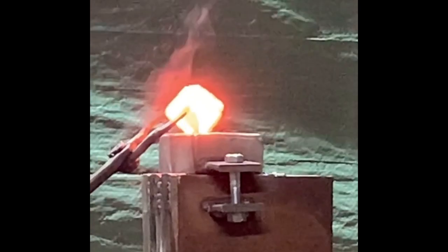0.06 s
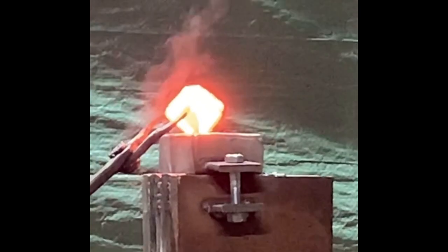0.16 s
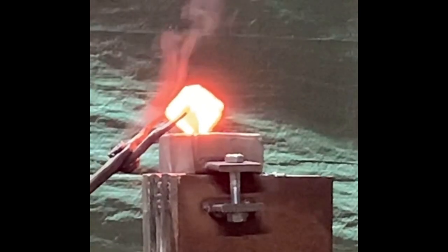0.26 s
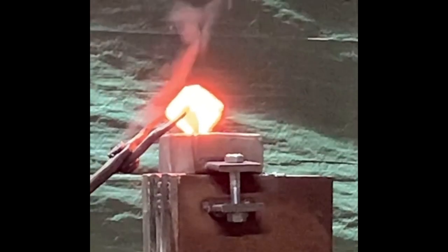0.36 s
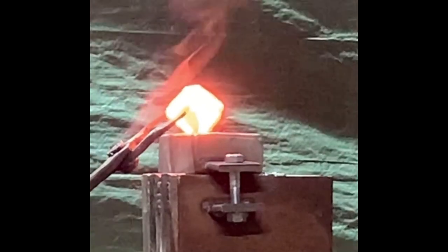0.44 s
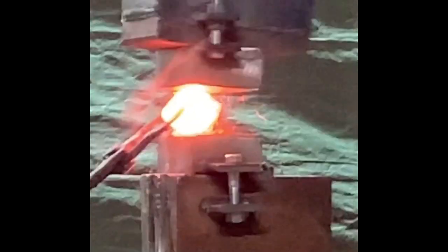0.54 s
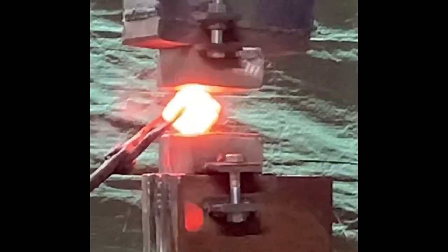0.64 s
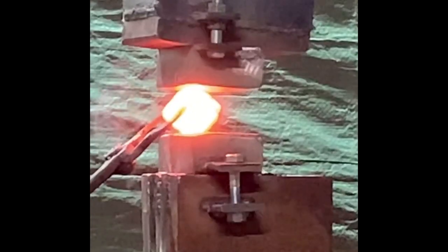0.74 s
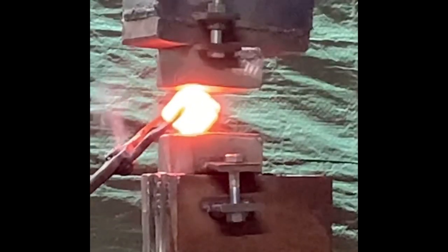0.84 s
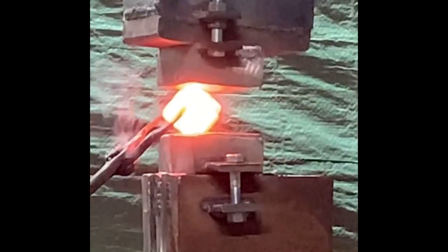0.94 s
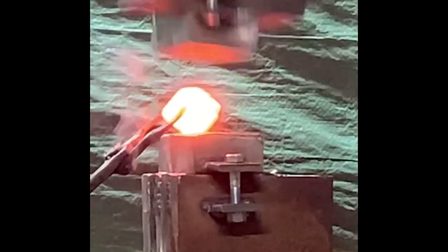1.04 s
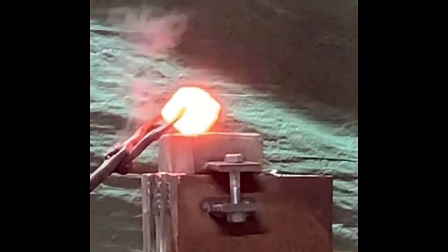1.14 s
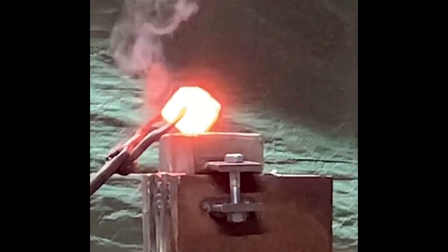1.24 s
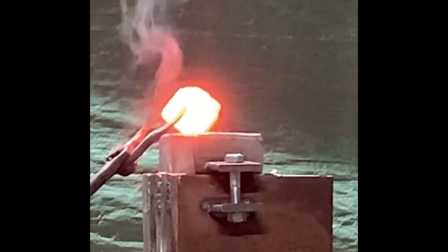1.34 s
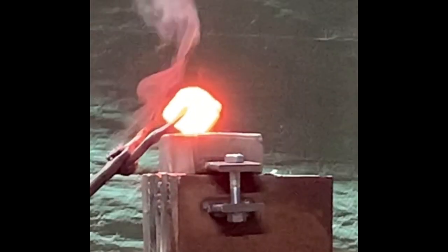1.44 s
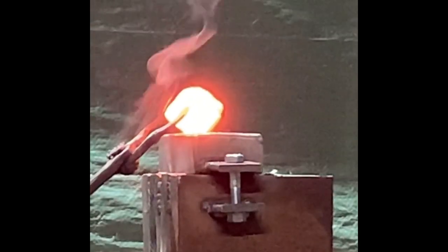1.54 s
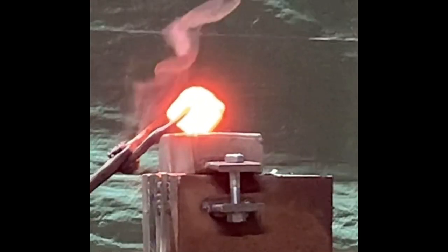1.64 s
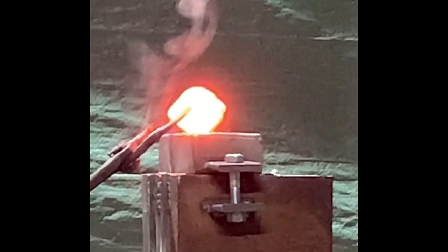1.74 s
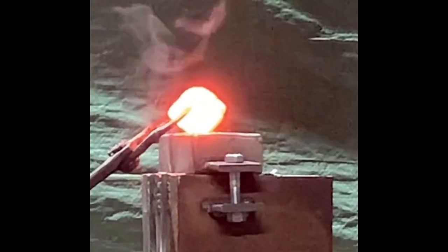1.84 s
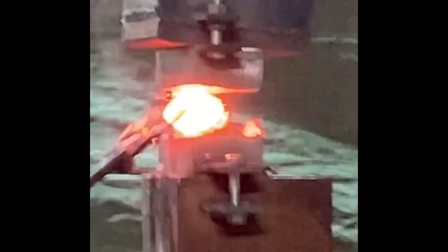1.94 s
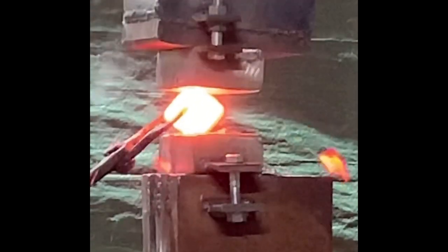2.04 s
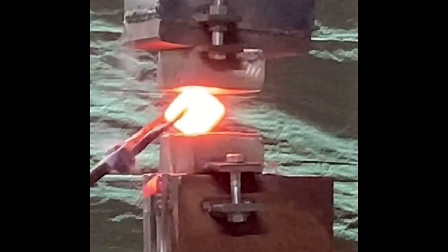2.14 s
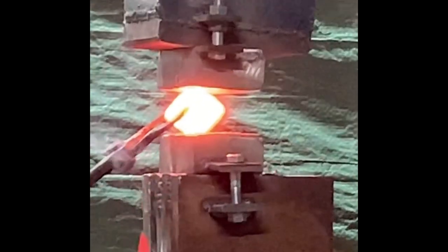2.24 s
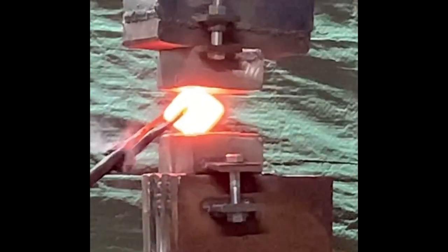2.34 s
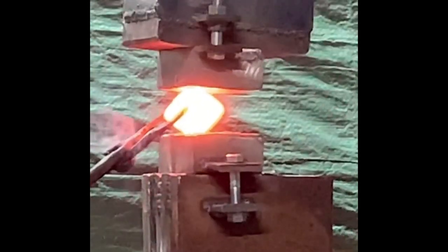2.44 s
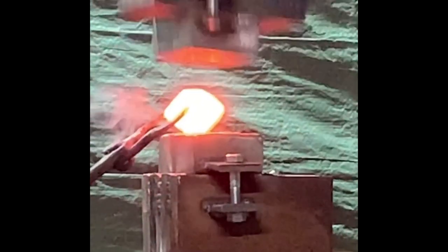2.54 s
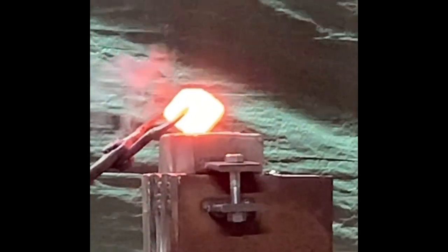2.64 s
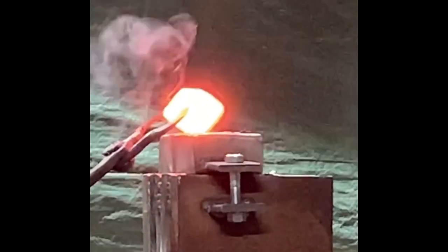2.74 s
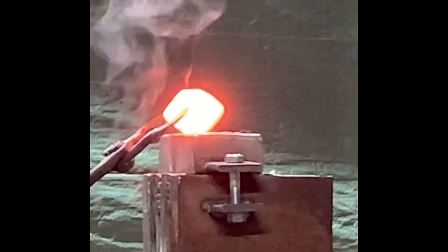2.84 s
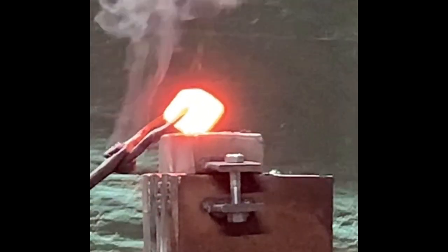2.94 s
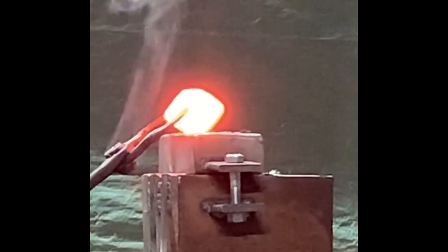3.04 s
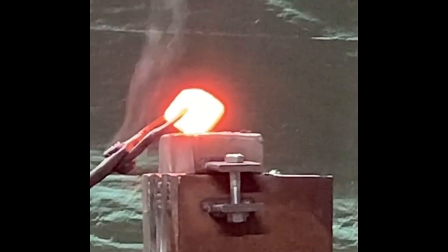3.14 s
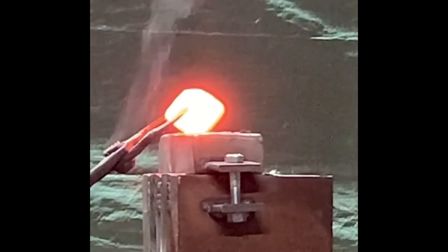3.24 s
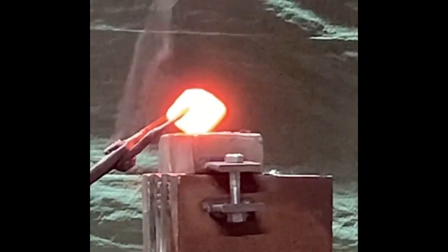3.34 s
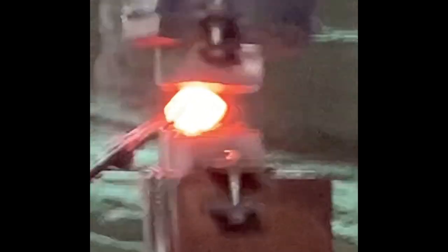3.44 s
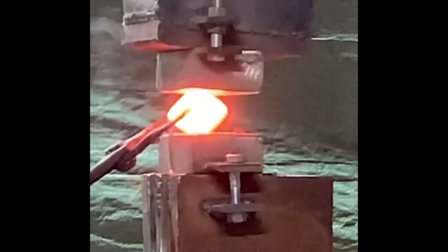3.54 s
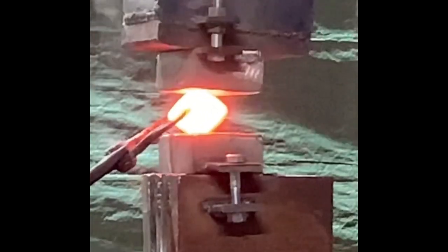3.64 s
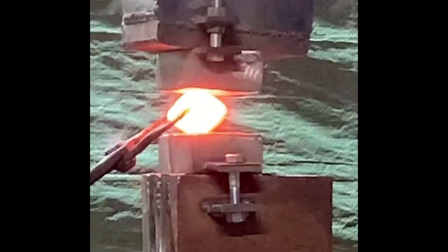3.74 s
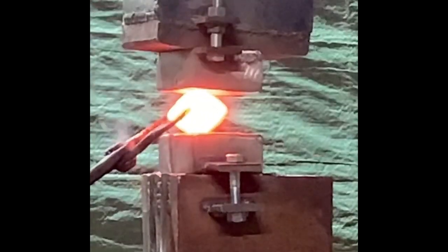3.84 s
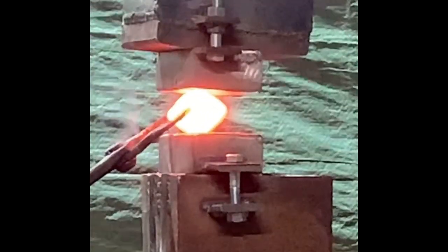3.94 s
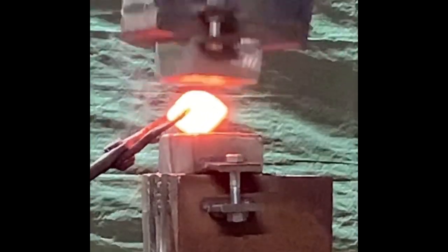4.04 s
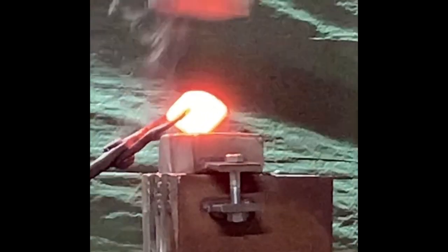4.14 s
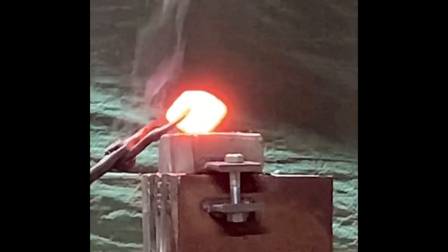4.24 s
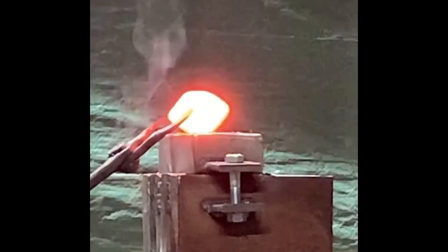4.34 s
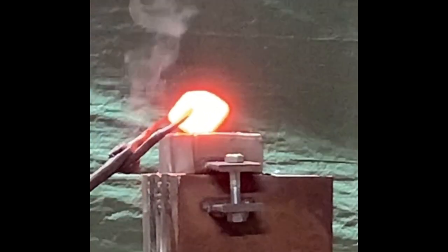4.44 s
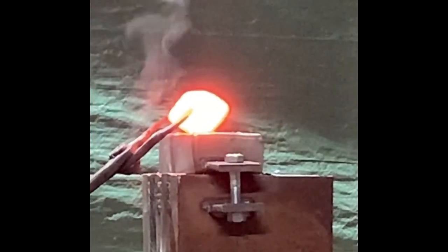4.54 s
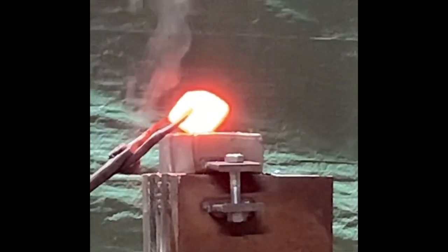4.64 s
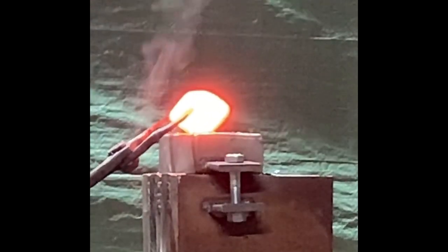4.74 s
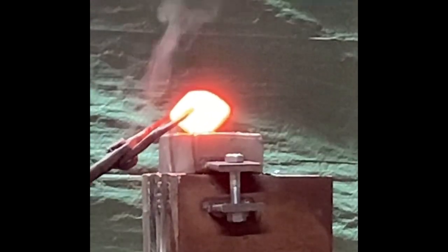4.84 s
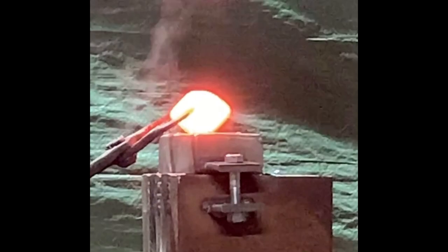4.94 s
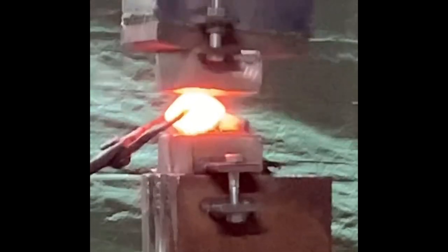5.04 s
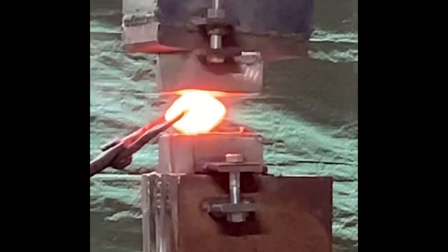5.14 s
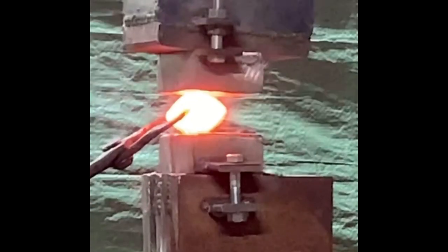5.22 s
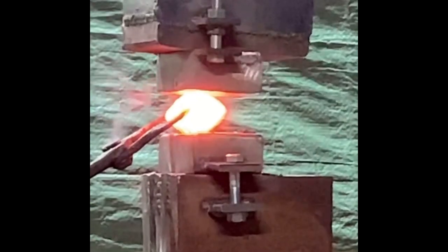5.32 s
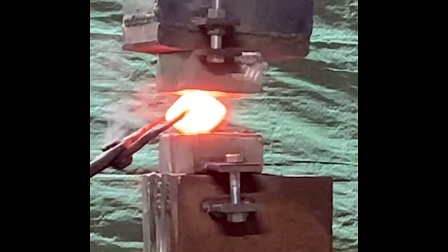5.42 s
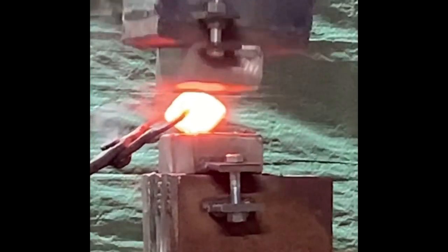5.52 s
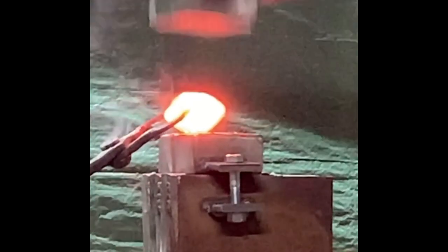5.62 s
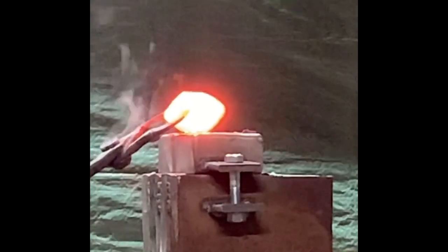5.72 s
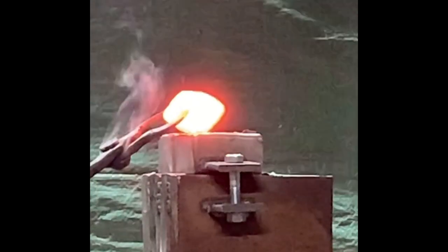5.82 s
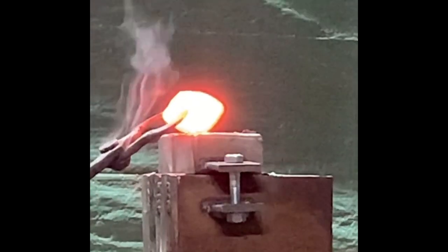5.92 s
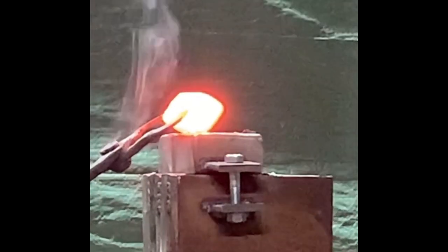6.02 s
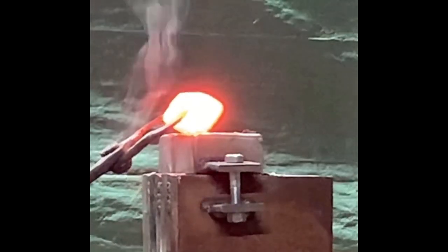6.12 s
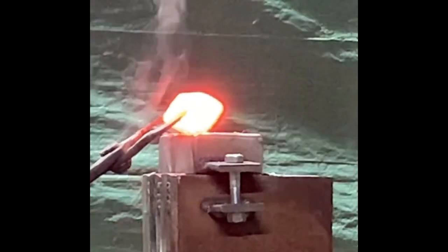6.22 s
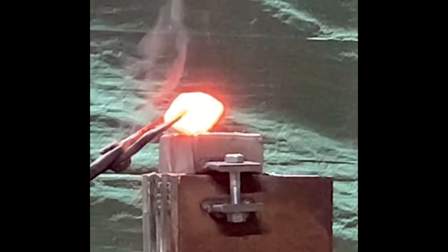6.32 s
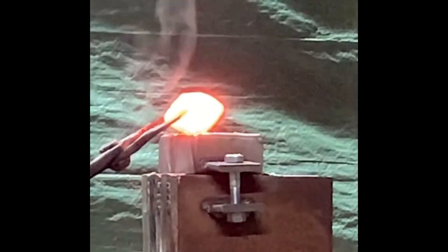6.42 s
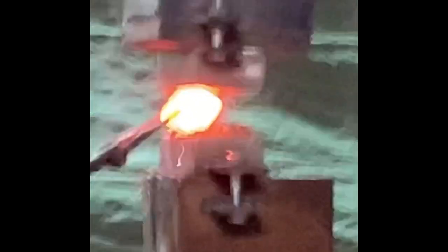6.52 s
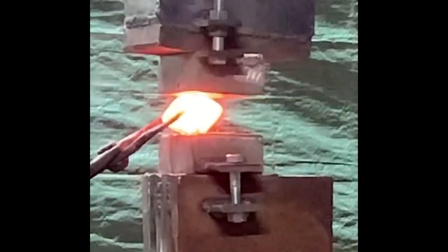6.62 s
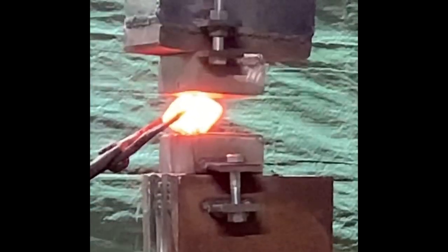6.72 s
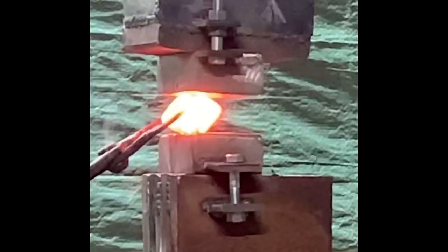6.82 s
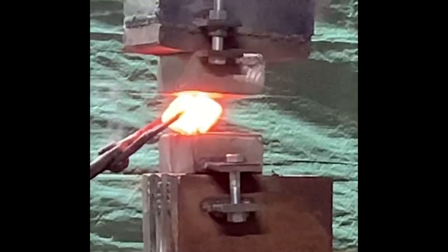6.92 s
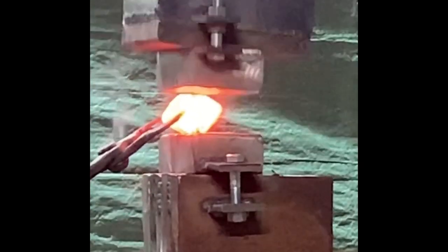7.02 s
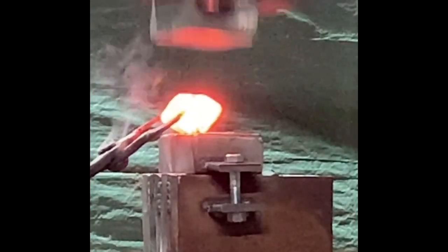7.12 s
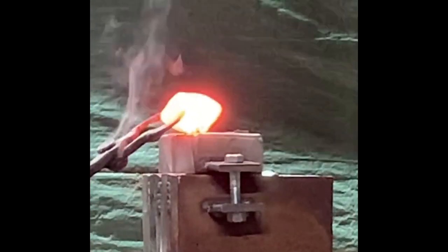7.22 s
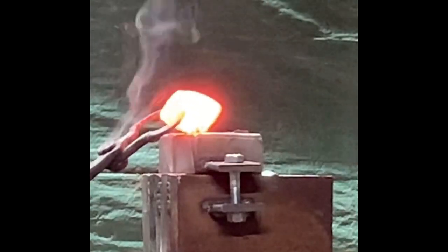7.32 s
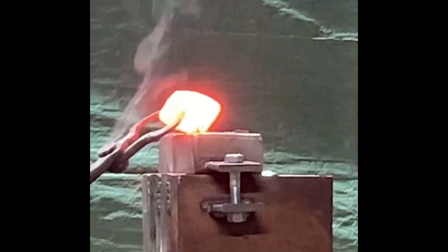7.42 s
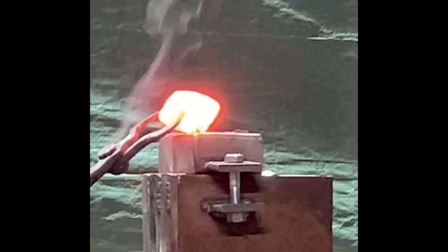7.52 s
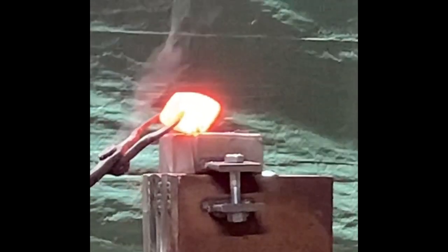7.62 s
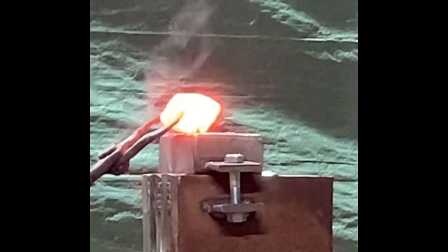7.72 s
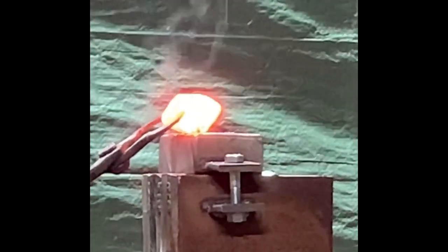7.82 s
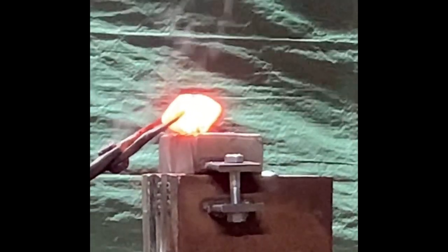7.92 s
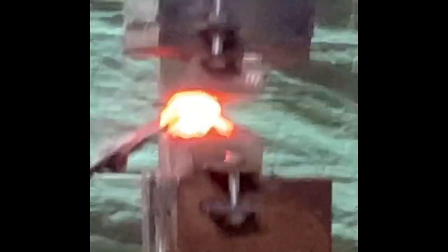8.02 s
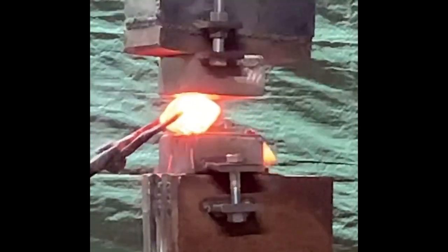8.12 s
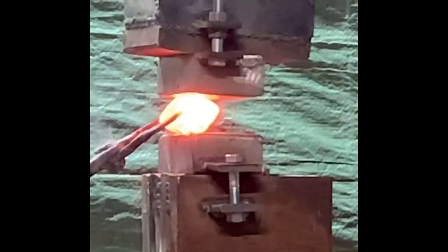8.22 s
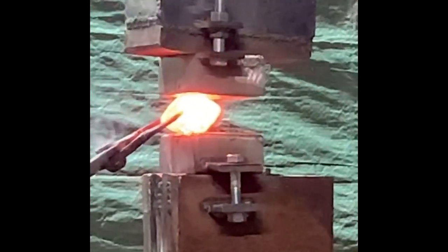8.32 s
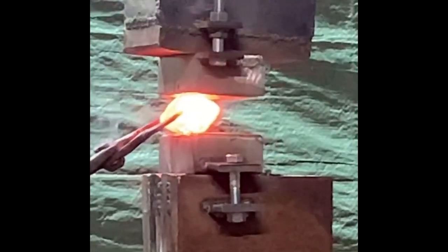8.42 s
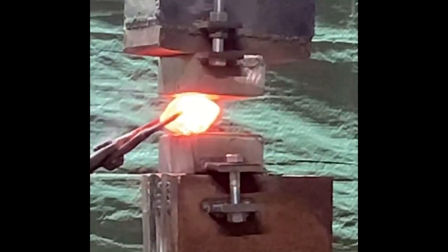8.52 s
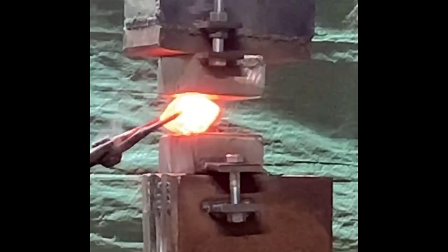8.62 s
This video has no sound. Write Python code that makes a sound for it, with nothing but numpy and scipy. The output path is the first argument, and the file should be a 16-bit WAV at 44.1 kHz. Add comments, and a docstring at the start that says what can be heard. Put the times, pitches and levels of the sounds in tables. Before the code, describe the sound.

Six heavy drop-hammer blows thud and crack on hot steel about 1.5 seconds apart, tackle clinking between them over a roaring gas forge.

```python
"""Drop hammer and gas forge

A drop hammer strikes hot steel six times, about a second and a half apart, before a roaring gas forge.
Impacts are noise bursts, wave packets and decaying modes; the ram's slide is noise rising in pitch.
Tackle clinks and jingles after each blow; flakes, tongs and guides add shaped noise and narrow resonances.
The forge is coloured noise that slowly settles; a limiter ducks the whole sound under strong peaks."""
import sys
import numpy as np
from scipy import signal
from scipy.fft import rfft, irfft, next_fast_len
from scipy.io import wavfile
from scipy.ndimage import uniform_filter1d, minimum_filter1d, map_coordinates

SR = 44100
rng = np.random.default_rng(int(sys.argv[2]) if len(sys.argv) > 2 else 0)


def log_audio(samples):
    """Write samples as a 16-bit WAV file to the path given in sys.argv[1]."""
    # one column per channel
    frames = np.atleast_2d(samples).T
    # limit to full scale, then quantise
    limited = np.clip(frames, -1, 1)
    pcm = np.round(limited * 32767).astype(np.int16)
    wavfile.write(sys.argv[1], SR, pcm)


N = 382347
TIME = np.arange(N) / SR

# All levels in the tables are relative; spectra are levels per Hz of bandwidth.
# Hammer blows; the yield of the hot steel delays the thud:
# start_s, force_db, crack_db, rebound_db, hoist_rattle_db, yield_s, flying_scale_db
BLOWS = [(0.5406, 5, 5.5, -25, 2, 0, 8.5), (1.97, 0, 3.5, -22, -1.5, .0006, 9.5),
         (3.4816, -0.5, 4.5, -3, -4.5, 0, 3), (5.039, -3, 0.5, 0, -10, 0.00065, 9.5),
         (6.5480, -3, 4.5, 4, -6, 0, -1), (8.069, -2, 2.5, -30, -3, 0.0029, -10)]
# Bending waves of the frame, nominal pitch and crest time: freq_hz, level_db, crest_s
BENDING_WAVES = [(133, -5.5, 0.0124), (386, -6.5, 0.00782), (463, -16, 0.00635), (832, -10.5, 0.00478),
                 (1520, -13.5, 0.0032), (2860, -17, 0.00184)]
# Modes of anvil and frame: freq_hz, level_db, t60_s
FRAME_MODES = [(112, 2.5, 0.13), (204, .5, 0.22), (347, 2, 0.17), (410, -4, .16), (481, -2, 0.19),
               (582, 1, 0.18), (808, -1, 0.14), (1023, 1, 0.13), (1085, -6, .13), (1321, -5, 0.17),
               (1486, -4, .15), (1560, -8, 0.13), (2031, -13, .16), (2128, -13, 0.15), (6782, -15, .12),
               (12345, -22, .25), (12660, -16, 0.27)]
# Modes of the hopping ram: freq_hz, level_db, t60_s
RAM_MODES = [(1060, -11, 0.15), (1304, -1.5, 0.17), (1450, -2, 0.086)]
# Modes of the tackle: freq_hz, level_db, t60_s
TACKLE_MODES = [(5640, -1, 0.12), (5870, -9, 0.17), (7470, 4, .1), (7610, 5, 0.24), (13150, -5, .1)]
# Spectrum of the dies' crack: freq_hz, level_db
CRACK_COLOUR = [(1000, -1), (2900, -18), (4000, -25), (5300, -4), (6900, 10), (8000, 0), (10500, -0.5),
                (12200, -2), (16000, 4.5)]
# Spectrum of the clatter in the shop: freq_hz, level_db
CLATTER_COLOUR = [(30, 5), (130, 14.5), (300, 1), (560, 7), (720, -1.5), (1100, 3), (1550, -5), (1800, -12),
                  (2400, -2.5), (4000, -9), (7500, -5.5), (11000, -11), (12600, -7), (16000, -17)]
# Spectrum of the rebound: freq_hz, level_db
REBOUND_COLOUR = [(200, 10), (620, 9), (900, 4), (1350, 6), (2100, -8), (6000, -9), (16000, -13)]
# Spectrum of the ram running down its guides: freq_hz, level_db
SLIDE_COLOUR = [(500, 0), (1200, 16.5), (1700, -7), (4350, 12), (4850, 21.5), (5300, 14.5), (6200, 8.5),
                (8000, 1), (8950, 5), (9350, 24), (10000, 7), (16000, 11)]
# Spectrum of brittle scale crunching: freq_hz, level_db
CRUSH_COLOUR = [(250, -26), (600, 7.5), (1300, 2), (3000, 4.5), (6000, -7), (16000, -26)]
# Spectrum of flying flakes of scale: freq_hz, level_db
FLAKE_COLOUR = [(2000, -12), (6000, 3), (10000, -6), (12500, 2), (16000, 7.5)]
# Spectrum of the snapping and rubbing tackle: freq_hz, level_db
STEEL_COLOUR = [(1000, 1), (4900, -6), (5600, 11), (6500, 1), (7350, 3), (7590, 17), (7850, 5),
                (10500, -5.5), (16000, 2)]
# Spectrum of the dry contact in a hard knock: freq_hz, level_db
CONTACT_COLOUR = [(1000, -6), (4000, -11), (12700, -14), (13150, 17), (13700, -1), (16000, -7)]
# Spectrum of the tongs' ticks: freq_hz, level_db
TICK_COLOUR = [(800, -5), (4000, -7), (8500, 1), (9500, 10), (10500, -2), (16000, 3.5)]
# Spectrum of the ram rubbing its guides: freq_hz, level_db
GUIDE_COLOUR = [(600, -10), (1050, -8), (1170, 9), (1300, -16), (1600, -21), (6000, -46)]
# Spectrum of the flame: freq_hz, level_db
ROAR_COLOUR = [(20, -38), (45, -13.5), (80, 1.5), (105, -3), (130, -7.5), (170, 0.5), (225, -9),
               (255, -5.5), (305, 1.5), (385, -3.5), (470, -13.5), (555, -17), (635, -12), (720, -21),
               (1000, -26.5), (2000, -45)]
# Spectrum of the gas jet heard directly: freq_hz, level_db
JET_COLOUR = [(600, 8), (950, 5), (1750, -5.5), (2100, 5), (3100, 2), (4200, 1), (5500, -0.5), (7400, -62),
              (16000, -64)]
# Spectrum of the hiss all around: freq_hz, level_db
HISS_COLOUR = [(600, -15), (1000, 4.5), (1700, 4), (2200, -3), (3800, -4), (6500, -1.5), (11000, -2),
               (13500, -4), (15500, 4)]
# Left-right likeness of the forge, before the treble spacing: freq_hz, correlation
FORGE_LIKENESS = [(60, 1), (130, 0.91), (290, 0.82), (640, -0.24), (1400, -0.068), (3100, -0.2),
                  (4300, -0.47), (5400, 0.73), (6300, -0.049), (8500, -0.067)]
# Left-right likeness of the other noises, before the treble spacing: freq_hz, correlation
BLOW_LIKENESS = [(100, 0.99), (400, 0.57), (1000, 0.53), (2000, 0.31), (3100, -0.44), (4300, 0.26),
                 (5400, -0.2), (6500, 0.65), (8500, -0.16)]
# Hard knocks of the swinging tackle: start_s, level_db
KNOCKS = [(0.0538, -27), (0.7497, -19), (0.818, -26), (0.955, -33), (0.997, -28), (1.1323, -27.5),
          (2.442, -30.5), (3.685, -26), (3.7443, -27.5), (4.001, -28.5), (4.176, -34), (6.7824, -32),
          (8.308, -29.5), (8.4813, -32.5)]
# Tongs slipping on the work: centre_s, level_db, pitch_hz
SLIPS = [(0.286, -39.5, 6170), (3.19, -44, 4730), (4.548, -38.5, 7530), (6.12, -46, 6000)]
# Dry ticks of the tongs: start_s, level_db
TICKS = [(2.691, -21.5), (2.8434, -26), (4.3141, -28), (5.5024, -29.5)]
# Ram rubbing tight spots in its guides: centre_s, level_db, gaussian_width_s
RUBS = [(3.86, -38, 0.027), (5.345, -37.5, 0.028), (6.246, -39, 0.026), (7.79, -40, 0.019)]
# Narrow resonances of shop and steel, one pattern shared by all rippled noises: freq_hz; unit spread
RIPPLE_HZ = np.geomspace(400, 17000, num=420)
RIPPLE = rng.standard_normal(len(RIPPLE_HZ)) * (RIPPLE_HZ > 600)

ROAR_DB, HISS_DB = -32, -45  # before the extra loudness of the start
START_EXTRA_DB, SETTLE_S = 12, 4.53
# Hoist: delay until the slack is taken up, then median interval and mean fading of the clinks
TAKE_UP_S, TAKE_UP_DB = .173, -21.5
CLINK_STEP_S, CLINK_DB, CLINK_FADE_DB_PER_S = 0.074, -29.5, 12.5
SLIP_WIDTH_S = 0.017
CUTOFF_HZ = 15700


def from_db(db):
    """Logarithmic level: 20 dB is a factor of ten in amplitude."""
    return 10 ** (np.asarray(db) / 20)


def rms_one(x):
    """Normalisation of mean power to one."""
    return x / np.sqrt(np.mean(x ** 2) + 1e-20)


def at_hz(points, hz):
    """Linear interpolation of a table on a log-frequency axis."""
    known_hz, values = np.transpose(points)
    return np.interp(np.log(hz + 1), np.log(known_hz), values)


def noise(spectrum, likeness, size=N, ripple_db=0, port_lag_s=0.00018, port_share=0.99):
    """Spectral shaping: mid and side noise set colour and interchannel correlation; rms 1."""
    padded = next_fast_len(size)
    hz = np.fft.rfftfreq(padded, 1 / SR)
    resonances_db = ripple_db * np.interp(hz, RIPPLE_HZ, RIPPLE)
    colour = from_db(at_hz(spectrum, hz) + resonances_db)
    mid, side = rfft(rng.standard_normal((2, padded))) * colour
    # treble reaches the two microphones a moment apart, so it swings in and out of phase with pitch
    treble = np.minimum(hz / 8000, 1) ** 6
    spaced = port_share * treble * np.cos(2 * np.pi * hz * port_lag_s)
    alike = np.clip(at_hz(likeness, hz) + spaced, -.95, .98)
    mid, side = mid * np.sqrt(1 + alike), side * np.sqrt(1 - alike)
    stereo = irfft([mid + side, mid - side], padded)
    return rms_one(stereo[:, :size])


def fade(t, t60):
    """Exponential decay from t = 0, falling 60 dB in t60 seconds."""
    return (t >= 0) * np.exp(-np.log(1000) * np.maximum(t, 0) / t60)


def swell(t, rise_s):
    """Gradual onset: a Gaussian approach to full amplitude from t = 0."""
    return 1 - np.exp(-(np.maximum(t, 0) / rise_s) ** 2)


def bell(t, width_s):
    """Gaussian envelope centred on t = 0."""
    return np.exp(-.5 * (t / width_s) ** 2)


def add(out, s, sound):
    """Superposition: mix a sound in at time s."""
    start = int(np.clip(round(s * SR), 0, N))
    out[:, start:start + sound.shape[-1]] += sound[..., :N - start]


def ring(modes, t, vary_db, detune, apart_hz):
    """Modal decay: struck modes vary in strength, and high ones differ in phase between channels."""
    out = np.zeros((2, len(t)))
    for hz, db, t60 in modes:
        strength, pitch, phase, apart = rng.standard_normal(4)
        channel_phase = apart * min(hz / apart_hz, 1) * np.array([[.5], [-.5]])
        phases = np.pi * (phase + channel_phase)
        tone = np.sin(2 * np.pi * hz * (1 + detune * pitch) * t + phases)
        out += from_db(db + vary_db * strength) * tone * fade(t, t60)
    return out


def grain(size, depth_db, grain_s):
    """Amplitude modulation: a random gain that jumps about within milliseconds; rms 1."""
    slow = uniform_filter1d(rng.standard_normal(size), int(grain_s * SR) + 1)
    return rms_one(from_db(depth_db * rms_one(slow)))


def flutter(x, depth_db, width_hz, length_s, size=256):
    """Short-time spectral modulation: narrow bands of a noise swell and sink."""
    hz, s, bands = signal.stft(x, SR, nperseg=size)
    slow = rng.standard_normal((len(hz), len(s)))
    slow = uniform_filter1d(slow, int(length_s / s[1]) + 1, axis=1)
    slow = rms_one(uniform_filter1d(slow, int(width_hz / hz[1]) + 1, axis=0))
    gain = rms_one(from_db(depth_db * slow))
    return signal.istft(bands * gain, SR, nperseg=size)[1][:, :x.shape[1]]


def forge(jet_db=-3.5):
    """Turbulence: flame roar and gas hiss as noise, the direct jet reaching the left microphone first."""
    settling = from_db(START_EXTRA_DB * np.exp(-TIME / SETTLE_S))
    jet = noise(JET_COLOUR, FORGE_LIKENESS, ripple_db=2.5)[0]
    direct = np.array([jet, np.roll(jet, 21)])  # right lags by 21 samples
    around = noise(HISS_COLOUR, FORGE_LIKENESS, ripple_db=4.5)
    hiss = flutter(from_db(jet_db) * direct + around, depth_db=2.0, width_hz=350, length_s=.03)
    roar = noise(ROAR_COLOUR, FORGE_LIKENESS)
    return settling * (from_db(ROAR_DB) * roar + from_db(HISS_DB) * hiss)


def lift_clinks(s, rattle_db, count=9, uneven=.45, vary_db=1.5):
    """Sudden tension: the slack snaps taut, then clinks follow unevenly and fade; gives (s, dB)."""
    step, strength = rng.standard_normal((count, 2)).T
    later = np.cumsum(CLINK_STEP_S * np.exp(uneven * step))
    levels = CLINK_DB - CLINK_FADE_DB_PER_S * later + vary_db * strength
    events = [(0, TAKE_UP_DB), *zip(later, levels)]
    return [(s + TAKE_UP_S + wait, rattle_db + db) for wait, db in events]


def hoist(lift_s=0.32, spread_s=0.21, jingle_db=-48.0, rub_db=-35.0):
    """Impact and friction: tackle clinks, jingles and rubs in each lift; knocks have a dry contact."""
    snap_db, ring_db, contact_db, contact_t60 = -0.5, -9.0, -1.0, 0.052
    out, t = np.zeros((2, N)), TIME[:SR // 5]
    lifting = np.zeros(N)
    strikes = list(KNOCKS)
    for s, _, _, _, rattle_db, _, _ in BLOWS:
        lifting += from_db(rattle_db) * bell(TIME - s - lift_s, spread_s)
        strikes += lift_clinks(s, rattle_db)
        for _ in range(18):  # small jingles
            moment = s + lift_s + spread_s * rng.uniform(-0.53, 2.4)
            strikes.append((moment, jingle_db + rattle_db + rng.normal(0, 1.4)))
    for s, db in strikes:
        snap = noise(STEEL_COLOUR, BLOW_LIKENESS, len(t), ripple_db=3.0) * fade(t, 0.12)
        modes = ring(TACKLE_MODES, t, vary_db=3, detune=.005, apart_hz=5000)
        clink = from_db(snap_db) * snap + from_db(ring_db) * modes
        add(out, s, from_db(db) * clink * swell(t, 0.00075))
    contacts = sum(from_db(db + contact_db) * fade(TIME - s, contact_t60) for s, db in KNOCKS)
    out += contacts * noise(CONTACT_COLOUR, BLOW_LIKENESS)
    steel = noise(STEEL_COLOUR, BLOW_LIKENESS, ripple_db=3.0)
    rub = flutter(steel, depth_db=4.0, width_hz=400, length_s=0.018)
    return out + from_db(rub_db) * lifting * rub


def squeaks(width_hz=40.0):
    """Friction-excited resonance: each slip of the tongs stirs one narrow band."""
    out, t = np.zeros((2, N)), TIME[:SR // 2]
    middle = t.mean()
    for s, db, hz in SLIPS:
        b, a = signal.iirpeak(hz, hz / width_hz, SR)
        friction = noise([(hz / 2, -20), (hz, 0), (hz * 2, -20)], BLOW_LIKENESS, len(t))
        tone = rms_one(signal.lfilter(b, a, friction))
        add(out, s - middle, from_db(db) * tone * bell(t - middle, SLIP_WIDTH_S))
    return out


def falling_ram(level_db=-30.0, fall_s=0.13, glide=.035, crush_db=-16.5, crush_s=0.0043):
    """Sliding friction grows louder and higher with speed; brittle scale crunches around each impact."""
    speed, crush = np.zeros(N), np.zeros(N)
    for s, *_ in BLOWS:
        speed += np.clip(1 + (TIME - s) / fall_s, 0, None) * (TIME < s)
        crush += np.exp(-np.abs(TIME - s) / crush_s)
    # reading the noise faster as the ram gathers speed raises its pitch
    travel = np.cumsum(1 - glide * (1 - speed))
    slide = noise(SLIDE_COLOUR, BLOW_LIKENESS, ripple_db=3.5)
    swish = np.array([map_coordinates(channel, [travel], order=3) for channel in slide])
    swish = flutter(swish, depth_db=5.5, width_hz=400, length_s=0.029)
    scale = noise(CRUSH_COLOUR, BLOW_LIKENESS)
    return from_db(level_db) * speed * swish + from_db(crush_db) * crush * scale


def thud(t, compact=9.0, lag_s=.00007):
    """Dispersion: bending waves cross the frame as short packets, high ones cresting first."""
    out = np.zeros((2, len(t)))
    t = np.maximum(t - np.array([[0], [lag_s]]), 0)  # right lags left
    for hz, db, crest_s in BENDING_WAVES:
        pitch, late = 1 + .03 * rng.standard_normal(2)
        crest = crest_s * late
        age = t / crest
        packet = (age * np.exp(1 - age)) ** compact
        out -= from_db(db) * packet * np.cos(2 * np.pi * hz * pitch * (t - crest))
    return out


def shop_clatter(t, near_db=-1.0, room_db=-12.5):
    """Two-stage decay: loose things clatter as grainy noise that dies fast, then slowly."""
    rattle = grain(len(t), depth_db=2.2, grain_s=.004)
    loose = noise(CLATTER_COLOUR, BLOW_LIKENESS, len(t))
    loose = flutter(loose, depth_db=2.2, width_hz=500, length_s=.008)
    dying = from_db(near_db) * fade(t, 0.21) + from_db(room_db) * fade(t, 0.53)
    return loose * rattle * swell(t, 0.0058) * dying


def ram_rebound(t, knock_db=-4.5, ram_db=2.0):
    """Secondary impact: the ram hops and settles on the work, knocking the frame once more."""
    burst = noise(REBOUND_COLOUR, BLOW_LIKENESS, len(t), ripple_db=5.0) * fade(t, 0.3)
    frame = ring(FRAME_MODES, t, vary_db=1, detune=.001, apart_hz=3500)
    ram = ring(RAM_MODES, t, vary_db=1.5, detune=.002, apart_hz=3500)
    return (burst + from_db(knock_db) * frame + from_db(ram_db) * ram) * swell(t, 0.0033)


def hammer(thud_db=11.5, ring_db=-2.0, crack_db=0.5, rebound_db=-15.0, rebound_s=0.073):
    """Impact excitation: each blow drives crack, thud, frame modes and clatter, then one rebound."""
    out, t = np.zeros((2, N)), TIME[:SR * 2 // 3]
    for s, force_db, sharp_db, bounce_db, _, yield_s, _ in BLOWS:
        crack = noise(CRACK_COLOUR, BLOW_LIKENESS, len(t), ripple_db=2.5)
        crack = from_db(crack_db + sharp_db) * crack * swell(t, 0.0002) * fade(t, 0.026)
        frame = ring(FRAME_MODES, t, vary_db=1, detune=.001, apart_hz=3500)
        frame = from_db(ring_db) * frame * swell(t, 0.011)
        low_blow = from_db(thud_db) * thud(t - yield_s)
        add(out, s, from_db(force_db) * (crack + low_blow + frame + shop_clatter(t)))
        add(out, s + rebound_s, from_db(force_db + rebound_db + bounce_db) * ram_rebound(t))
    return out


def flying_scale(level_db=-16.0, delay_s=0.017, rise_s=.004, t60=0.4):
    """Many small impacts: flakes burst off the work and patter down as fluttering, decaying noise."""
    shower = np.zeros(N)
    for s, force_db, *_, scale_db in BLOWS:
        t = TIME - s - delay_s
        shower += from_db(force_db + scale_db) * swell(t, rise_s) * fade(t, t60)
    flakes = noise(FLAKE_COLOUR, BLOW_LIKENESS, ripple_db=3.0)
    return from_db(level_db) * shower * flutter(flakes, depth_db=4.5, width_hz=600, length_s=0.025)


def tongs(level_db=-4.0):
    """Damped impact: dry ticks of decaying noise as the work is shifted on the die."""
    touches = sum(from_db(db + level_db) * fade(TIME - s, 0.14) for s, db in TICKS)
    return touches * noise(TICK_COLOUR, BLOW_LIKENESS)


def rubbing():
    """Irregular friction: short hoarse puffs of grainy noise where the ram drags in its guides."""
    drag = sum(from_db(db) * bell(TIME - s, width_s) for s, db, width_s in RUBS)
    return drag * grain(N, depth_db=4.0, grain_s=.005) * noise(GUIDE_COLOUR, BLOW_LIKENESS)


def scene():
    """Superposition of the forge, the hammer and everything that moves with it."""
    background = forge() + hoist() + squeaks()
    blows = falling_ram() + hammer() + flying_scale()
    return background + blows + tongs() + rubbing()


def limiter(x, ceiling_db=0.5, hold_s=0.14, release_db_per_s=111.0, attack_s=0.00072):
    """Peak limiting: the shared gain drops quickly under a peak, holds, then climbs back."""
    over = np.maximum(20 * np.log10(np.abs(x).max(axis=0) + 1e-9) - ceiling_db, 0)
    half = int(hold_s * SR / 2)
    held = -minimum_filter1d(-over, 2 * half + 1, origin=half)
    release = release_db_per_s * TIME
    reduction = np.maximum.accumulate(held + release) - release
    return x * from_db(-uniform_filter1d(reduction, int(attack_s * SR) + 1))


def record(dry):
    """Peak limiting, then low-pass filtering with a steep elliptic top cut."""
    top_cut = signal.ellip(10, .2, 75, CUTOFF_HZ, fs=SR, output="sos")
    return signal.sosfilt(top_cut, limiter(dry))


dry = scene()
out = record(dry)
log_audio(out)
```